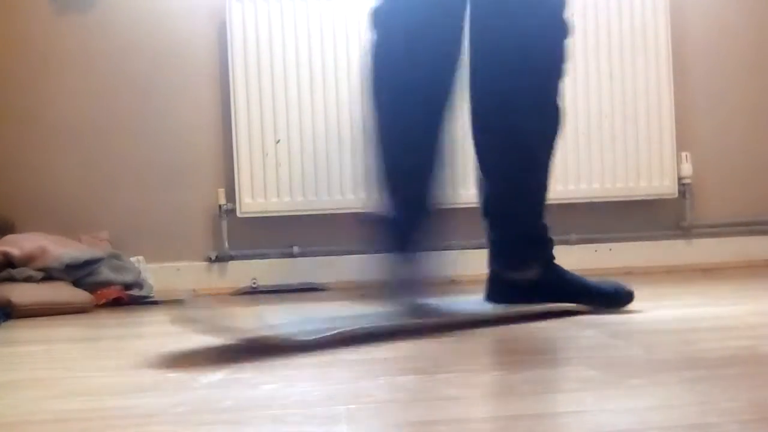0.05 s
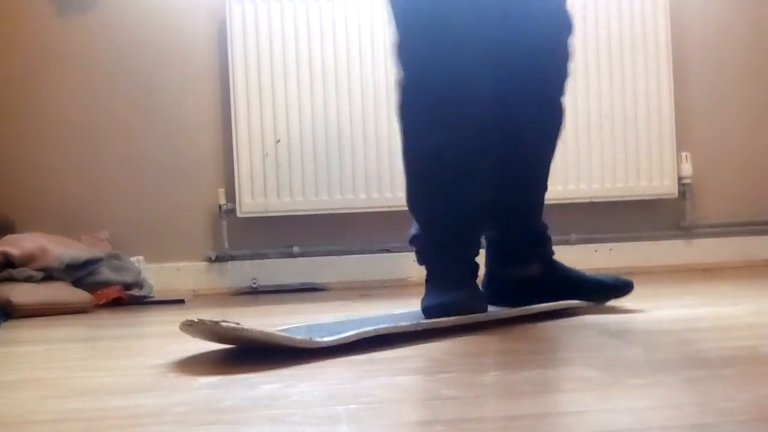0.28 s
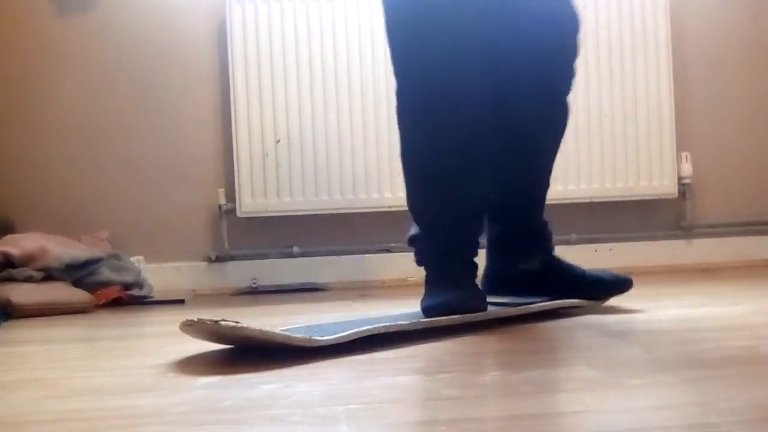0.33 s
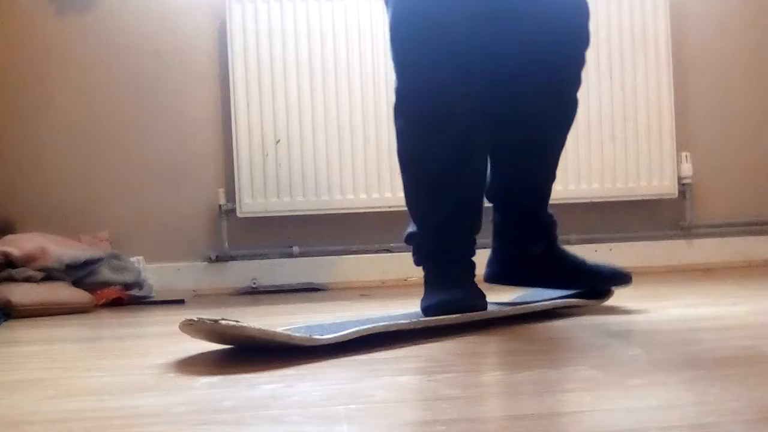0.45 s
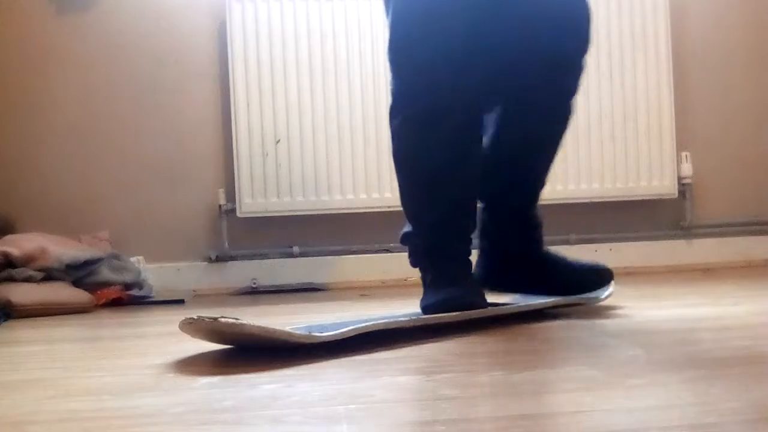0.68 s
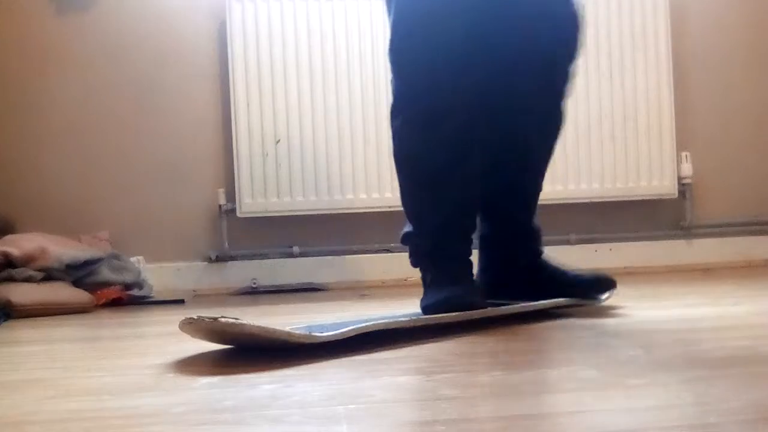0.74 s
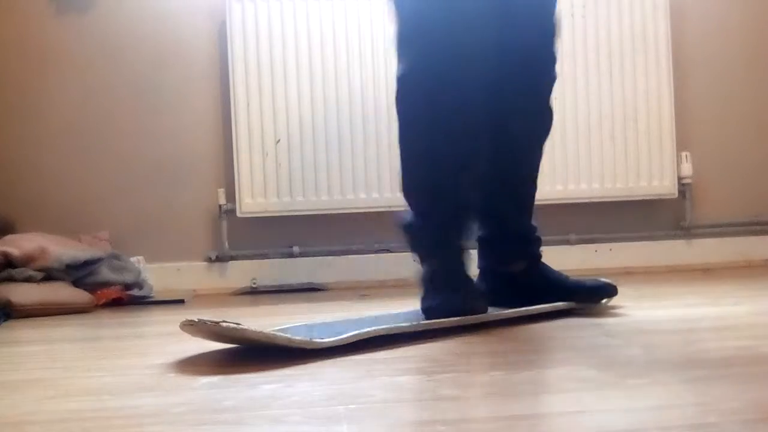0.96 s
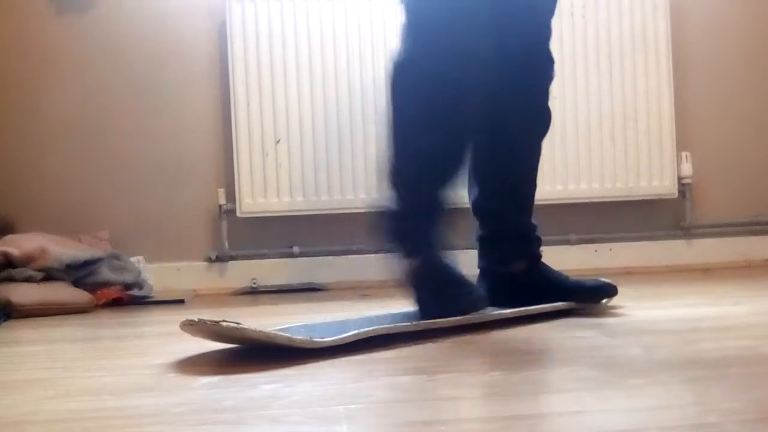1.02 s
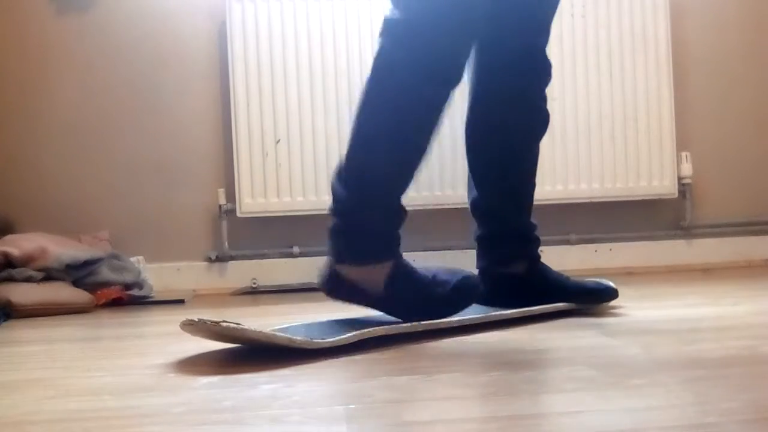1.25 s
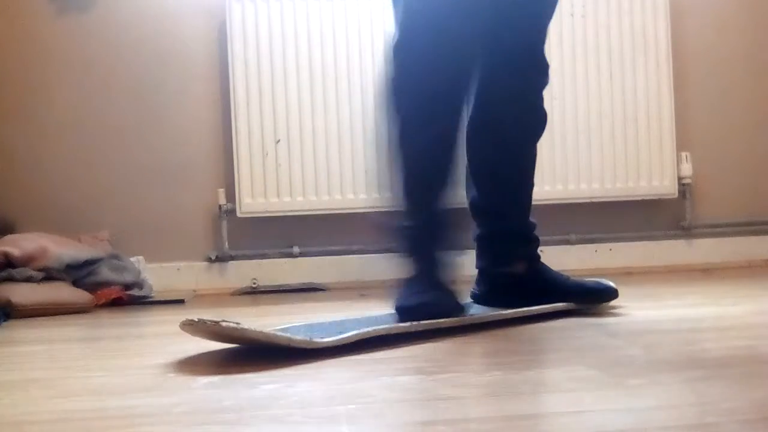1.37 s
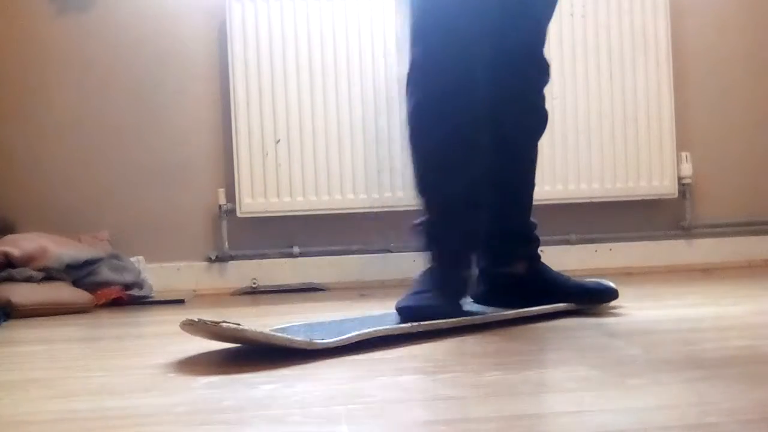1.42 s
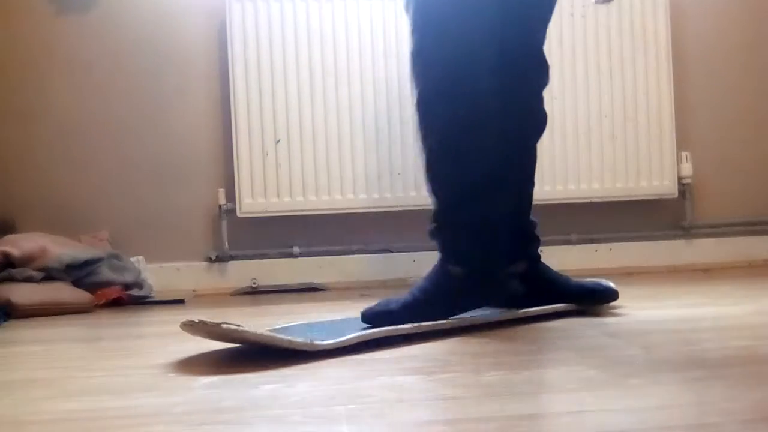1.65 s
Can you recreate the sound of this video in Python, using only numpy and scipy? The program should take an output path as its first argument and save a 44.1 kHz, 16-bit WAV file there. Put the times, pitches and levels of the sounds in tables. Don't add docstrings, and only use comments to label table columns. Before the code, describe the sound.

A wheel-less skateboard deck rubs grittily from the start and slaps laminate in a rapid, loud woody clatter at 0.1-0.2 s, with a short room tail. A quieter scrape swells around 0.4 s and fades. Small dull knocks come near 0.8 s. Soft hollow foot scuffs follow at 1.07-1.2 s, then a stronger drag with light ticks at 1.36-1.55 s, gliding away by 1.7 s over faint hiss and thin whine.

```python
import sys
import numpy as np
from scipy import signal
from scipy.fft import rfft, irfft, next_fast_len
from scipy.io import wavfile
from scipy.ndimage import map_coordinates

SR = 44100
rng = np.random.default_rng(int(sys.argv[2]) if len(sys.argv) > 2 else 0)


def elevation(decibels):
    levels = np.asarray(decibels, float)
    return 10 ** (levels / 20)


def inscribe(sig):
    pcm = np.round(np.clip(np.atleast_2d(sig).T, -1, 1) * 32767)
    wavfile.write(sys.argv[1], SR, pcm.astype(np.int16))


N = 74970

# (frequency [Hz], level per Hz [dB])
HUSH_SPECTRUM = [(24, -33), (45, -9), (140, 3.5), (700, -3), (1500, -1.5), (2600, -9), (5500, -9),
                 (7500, -22)]
HUSH_DB = -70.5
# (time [s], level [dB])
WHINE_LEVEL = [(0.2, -4.5), (.45, 0), (.56, -6.5), (.7, 1), (.84, 0), (.92, -4.5), (1.1, -4.5), (1.3, -2),
               (1.7, -0.5)]
WHINE_HZ, WHINE_DRIFT_RAD, WHINE_DB = 6216, 1.8, -83
HUM_HZ, HUM_WIDTH_HZ, HUM_DB, HUM_WOBBLE_DB = 1348.2, 18, -81, 2.5

# (time [s], pressure level [dB], brightening by speed [dB])
LANDING = [
    (0, -50.5, -8.5),
    (.04, -53.5, -12.5),
    (.088, -56, -5),
    (.098, -52, -6.5),
    (.108, -47, 3.5),
    (.12, -51, -1),
    (.155, -43.5, 0),
    (.19, -47.5, -2.5),
    (.29, -62.5, -2),
]
SLIDE = [
    (.22, -67, 16),
    (.31, -61, 6),
    (.43, -52.5, 1.5),
    (.47, -56.5, 5),
    (.55, -56, -4),
    (.6, -58.5, -23.5),
    (.69, -60, -4.5),
    (.77, -70.5, -1.5),
    (1.01, -80, 11.5),
]
SCUFF = [
    (1.03, -78, -3),
    (1.062, -68.5, 5.58),
    (1.078, -75, 7),
    (1.09, -56.5, -4.15),
    (1.15, -55, -3.3),
    (1.2, -67, 6.5),
    (1.238, -69, 1),
    (1.246, -95.5, 0.7),
    (1.29, -100, 8.1),
]
DRAG = [
    (1.33, -76.5, -11.5),
    (1.355, -60.5, -31),
    (1.375, -54, -6.5),
    (1.43, -47, 1.5),
    (1.47, -50.5, -1),
    (1.53, -56, 5),
    (1.62, -58.5, -6.5),
    (1.7, -69, 5),
]
GLIDE = [
    (1.44, -61, 0.0051),
    (1.5, -63, 0.0038),
    (1.55, -59, 0),
    (1.61, -60.5, 0),
    (1.65, -72, 0.025),
    (1.7, -75.5, 0),
]
# (frequency [Hz], width [Hz], level [dB])
LANDING_RES = [(166.5, 12, -17.5), (569.6, 149, -3), (1368, 373, -3), (1835, 210, -1.5), (2312, 143, 3),
               (3134, 690, -5), (5530, 2020, -13.5)]
SLIDE_RES = [(642.7, 106.6, -7), (910.5, 159, -7), (1197, 138, -9), (1701, 108.5, 1.5), (2205.5, 103, -4),
             (2726, 188, -13), (3482, 259, -16.5), (4580, 810, -29)]
SCUFF_RES = [(150, 27, -12.5), (517, 61.6, 3), (1146, 82, -7), (1346, 22, -6), (1645, 177, 0),
             (2233, 298, -1), (2950, 842, -8), (3656, 676, -9.5), (4653, 230, -19)]
DRAG_RES = [(142.2, 25.7, -8.5), (481.3, 77.2, 1), (704, 119.5, -1), (1268, 282, 3.5), (1836, 742, -1.5),
            (2455, 181, 3), (2916, 183, -1), (3658, 880, -6), (6340, 1180, -24)]
GLIDE_RES = [(566.7, 43.5, 2), (1300, 84, -22.5), (1595, 95, 1.5), (1895, 255, 1)]
GRAINS_PER_S, GRAIN_SPREAD_DB = 5000, 2.5
FUZZ_HZ = 3055

# (frequency [Hz], decay time t60 [s])
ROOM_T60 = [(100, 0.546), (250, 0.432), (550, 0.336), (1500, 0.4676), (4000, 0.614), (10000, 0.201)]
# (frequency [Hz], level [dB])
ROOM_COLOUR = [(100, -4), (300, -3.5), (800, 0), (2000, -0.5), (5200, 4), (7500, 0.5), (12000, -0.5)]
ROOM_DB, RUB_ROOM_DB, ROOM_DELAY_S, ROOM_HOP_S = -2.5, -11, .004, .018

# (time [s], floor thump level [dB], deck bending level [dB], edge clack level [dB], contact time [ms])
KNOCKS = [(.103, -67.5, -45.5, -57, 0.099), (0.108, -58.5, -45.5, -40.5, 0.066),
          (.143, -71, -37.5, -28.5, 0.053), (.19, -34.5, -37, -31, 0.091), (.2, -43, -45, -40, 0.089),
          (.779, -59.5, -50, -46, 0.157), (.8, -65, -51.5, -37.5, 0.185), (.806, -63.5, -47, -48, 0.136),
          (0.817, -55, -50.5, -44.5, 0.182), (1.41, -51.5, -51.5, -37, 0.049),
          (1.484, -59.5, -54, -40.5, 0.048), (.1180, -42.5, -33.5, -17, 0.073),
          (.134, -52.5, -34.5, -25, 0.109), (.1510, -26, -22.5, -16, 0.0307),
          (.156, -32, -24, -49.5, 0.0785), (.162, -38, -31.5, -66.5, 0.026),
          (.169, -38.5, -26, -43.5, 0.183), (0.176, -30, -34, -31, 0.05), (0.7743, -58, -48.5, -27, 0.19),
          (0.786, -53, -37, -58.5, 0.136), (1.363, -48, -75, -73.5, 0.162),
          (1.384, -66.5, -42, -58.5, 0.0625), (1.526, -76.5, -68, -40.5, 0.042)]
# (frequency [Hz], level [dB], decay time t60 [s])
THUMP = [(69.9, -8, 0.273), (122, -2.5, 0.1385), (175.54, 4, 0.107), (220.38, -2, 0.237),
         (268.1, -8, 0.271), (333.4, -10, 0.268), (356.7, -4.5, 0.199)]
# (frequency [Hz], level [dB], decay time t60 [s])
BEND = [(400.7, -12, 0.082), (474.9, 0, 0.0916), (518.5, -2.5, 0.0517), (582.9, 4, 0.0326),
        (659.9, 3, 0.0362), (747.7, -6.5, 0.0506), (814.5, -9, 0.0547), (931.6, -7.5, 0.039),
        (1057, 0, 0.032)]
# (frequency [Hz], level [dB], decay time t60 [s])
LOADED = [(109, -13, 0.12), (160.7, -10.5, 0.0755), (267, -10.5, 0.07), (482, 0, 0.052), (576.5, 2, 0.037),
          (661.6, 5, 0.0388), (706, 4, 0.033), (755, 0.5, 0.0315), (906.6, 0.5, 0.0528),
          (1109, -0.5, 0.058)]
# (frequency [Hz], level [dB], decay time t60 [s])
CLACK = [(1126.2, -7, 0.0394), (1360.9, 2, 0.02675), (1566.3, 4.5, 0.0184), (1764.2, 4.5, 0.0155),
         (1863.3, 2, 0.0141), (2089, 1.5, 0.0126), (2535, -10.5, 0.0247), (2995, -10.5, 0.0155),
         (3620, -26, 0.0077)]
# (start [s], end [s])
STOOD_ON = (.5, 1.0)
CRACK_DB, CRACK_T60_S = -4, .002
MODE_SCATTER_DB, DETUNE = 1.2, .004

# (time [s], frequency [Hz], level [dB], decay time t60 [s])
PING = (0.1246, 5202.5, -35, 0.0013)

# (time [s], level [dB], rise time [s], share of lowest mode [dB])
CATCHES = [
    (1.067, -53, 0.00245, -38.5),
    (1.082, -56.5, 0.0049, -26),
    (1.093, -41, 0.00737, -3.5),
    (1.107, -44, 0.0019, -6.5),
    (1.123, -51.5, 0.00113, -20.5),
    (1.21, -60.5, 0.0084, -26),
    (1.228, -65.5, .006, -22),
    (1.356, -40.5, 0.0085, -14.5),
    (1.367, -37, 0.0065, -24),
]
# (frequency [Hz], decay time t60 [s])
SING = [(1190, 0.046), (1352, 0.0558), (2500, 0.0247)]
SING_TOP_DB = -9.5

# (frequency [Hz], level [dB])
MIC = [(30, -20), (110, -12.5), (200, 1.5), (5500, 5), (7000, -0.5), (8500, -12), (13500, -11), (15000, 3)]
# (frequency [Hz], level per Hz [dB])
HISS = [(20, 16.5), (7000, -1.5), (13000, -1), (14800, 4), (16000, 15)]
HISS_DB, TOP_HZ = -80.5, 15650


def unit(x):
    return x / np.sqrt(np.mean(x ** 2) + 1e-20)


def along(points, hz):
    f, v = np.transpose(points)
    return np.interp(np.log(hz + 1), np.log(f + 1), v)


def wobble(rate):
    return map_coordinates(rng.standard_normal(2000), [np.arange(N) * rate / SR])


def filtered(x, response):
    m = next_fast_len(N + SR // 2)
    return irfft(rfft(x, m) * response(np.fft.rfftfreq(m, 1 / SR)), m)[..., :N]


def causal(gain):
    c = irfft(np.log(gain + 1e-6))
    c[1:len(c) // 2] *= 2
    c[len(c) // 2 + 1:] = 0
    return np.exp(rfft(c))


def narrow(centre_hz, width_hz):
    return unit(filtered(rng.standard_normal(N), lambda hz: 1 / (1 + ((hz - centre_hz) / width_hz) ** 2)))


def hush():
    t = np.arange(N) / SR
    colour = lambda hz: elevation(along(HUSH_SPECTRUM, hz) - along(MIC, hz)) * (hz < 8000)
    air = unit(filtered(rng.standard_normal(N), colour))
    air = elevation(HUSH_DB + 1.45 * wobble(6.44)) * air
    whine_db = WHINE_DB + np.interp(t, *np.transpose(WHINE_LEVEL))
    phase = 2 * np.pi * WHINE_HZ * t + WHINE_DRIFT_RAD * wobble(6.5)
    whine = elevation(whine_db) * np.sqrt(2) * np.sin(phase)
    hum = elevation(HUM_DB + HUM_WOBBLE_DB * wobble(3.23)) * narrow(HUM_HZ, HUM_WIDTH_HZ)
    return air + whine + hum


def rub(stroke, resonances, stutter_db, grit_db, fuzz_db):
    chance, sign, size = rng.random((3, N))
    grains = (chance < GRAINS_PER_S / SR) * np.sign(sign - .5) * elevation(-GRAIN_SPREAD_DB * np.log(size + 0.053))
    texture = elevation(grit_db) * unit(grains) + rng.standard_normal(N)
    drive = unit(texture * elevation(stutter_db * wobble(70.24)))

    def resonate(f):
        total = 0
        for k, (centre, width, db) in enumerate(resonances):
            band = 1j * f * width / (centre * centre - f * f + 1j * f * width)
            total = total + (-1) ** k * elevation(db) * band
        return total

    norm = np.sqrt(np.mean(np.abs(resonate(np.linspace(0, SR / 2, 4096))) ** 2))
    body = lambda f: resonate(f) / norm
    low = lambda f: 1 / (1 + 1j * f / FUZZ_HZ)
    t = np.arange(N) / SR
    s, db, speed_db = np.transpose(stroke)
    pressed = drive * elevation(np.interp(t, s, db, left=-200, right=-200))
    fast = pressed * elevation(np.interp(t, s, speed_db))
    dull_part = filtered(pressed, lambda f: body(f) * low(f))
    bright_part = filtered(fast, lambda f: (body(f) + elevation(fuzz_db)) * (1 - low(f)))
    return dull_part + bright_part


def room(x):
    out, hop = np.zeros(N + 2 * SR), round(ROOM_HOP_S * SR)
    hz, u, z = signal.stft(rng.standard_normal((N // hop + 1, SR // 2)), SR, nperseg=256)
    decay_db = along(ROOM_COLOUR, hz)[:, None] - 60 * u / along(ROOM_T60, hz)[:, None]
    tails = signal.istft(z * elevation(decay_db), SR, nperseg=256)[1][:, :SR // 2]
    padded = np.pad(x, (hop, 2 * hop))
    fade = np.sin(np.pi * np.arange(2 * hop) / (2 * hop))
    for k, tail in enumerate(tails):
        stretch = padded[k * hop:][:2 * hop] * fade
        answer = signal.fftconvolve(stretch, tail / np.linalg.norm(tail))
        out[k * hop + round(ROOM_DELAY_S * SR):][:len(answer)] += answer
    return out[hop:][:N]


def ring(modes, t):
    total = 0
    for hz, db, t60 in modes:
        envelope = elevation(db + MODE_SCATTER_DB * rng.standard_normal() - 60 * t / t60)
        tuned_hz = hz * (1 + DETUNE * rng.standard_normal())
        total = total + envelope * np.sin(2 * np.pi * tuned_hz * t + rng.uniform(0, 1))
    return total


def knocks():
    out, t = np.zeros(N + SR), np.arange(SR // 2) / SR
    for s, thump_db, bend_db, clack_db, contact_ms in KNOCKS:
        deck_modes = LOADED if STOOD_ON[0] < s < STOOD_ON[1] else BEND
        crack = elevation(clack_db + CRACK_DB - 60 * t / CRACK_T60_S) * rng.standard_normal(len(t))
        thump = elevation(thump_db - 11.5) * ring(THUMP, t) * (1 - np.exp(-t / 0.000696))
        deck = elevation(bend_db - 8.0) * ring(deck_modes, t) + elevation(clack_db - 8.5) * ring(CLACK, t)
        hit = thump + deck * (1 - np.exp(-t / 0.000487)) + crack
        force = t[:200] * np.exp(-t[:200] * 1000 / contact_ms)
        out[round(s * SR):][:len(t)] += np.convolve(hit, force / force.sum())[:len(t)]
    return out[:N]


def ping():
    s, hz, db, t60 = PING
    t = np.clip(np.arange(N) / SR - s, 0, None)
    return elevation(db - 60 * t / t60) * np.sin(2 * np.pi * hz * t) * (1 - np.exp(-t / 0.00092))


def catches():
    out, t = np.zeros(N + SR), np.arange(SR // 2) / SR
    for s, db, rise, low_db in CATCHES:
        tones = [(hz, level, t60) for (hz, t60), level in zip(SING, (low_db, 0, SING_TOP_DB))]
        onset = np.sin(np.pi / 2 * np.clip(t / rise, 0, 1)) ** 2
        out[round(s * SR):][:len(t)] += elevation(db) * ring(tones, t) * onset
    return out[:N]


def scene():
    rubs = rub(LANDING, LANDING_RES, stutter_db=-0.5, grit_db=-7.5, fuzz_db=-11.0)
    rubs += rub(SLIDE, SLIDE_RES, stutter_db=-0.72, grit_db=-3.5, fuzz_db=-40)
    rubs += rub(SCUFF, SCUFF_RES, stutter_db=0.74, grit_db=-6.5, fuzz_db=-15.0)
    rubs += rub(DRAG, DRAG_RES, stutter_db=1.0, grit_db=-10, fuzz_db=-27.0)
    rubs += rub(GLIDE, GLIDE_RES, stutter_db=-2.5, grit_db=9.5, fuzz_db=-41)
    hits = knocks() + catches()
    reverberation = room(elevation(ROOM_DB) * hits + elevation(RUB_ROOM_DB) * rubs)
    return (hits + ping() + rubs + reverberation + hush())[None]


def low_pass(x):
    return signal.sosfilt(signal.butter(12, 15680, fs=SR, output="sos"), x)


def record(dry):
    hiss = unit(filtered(rng.standard_normal(N), lambda hz: elevation(along(HISS, hz)) * (hz < 16000)))
    heard = filtered(dry, lambda hz: causal(elevation(along(MIC, hz))))
    mix = filtered(heard + elevation(HISS_DB) * hiss, lambda hz: hz < TOP_HZ)
    return low_pass(mix)


dry = scene()
out = record(dry)
inscribe(out)
```